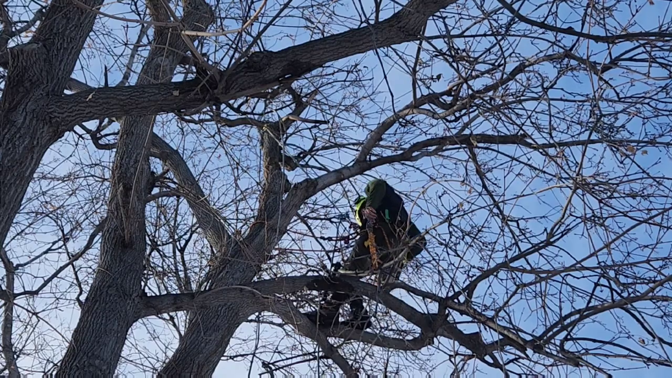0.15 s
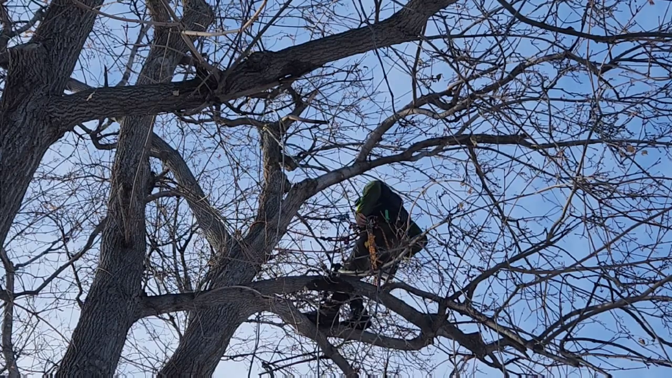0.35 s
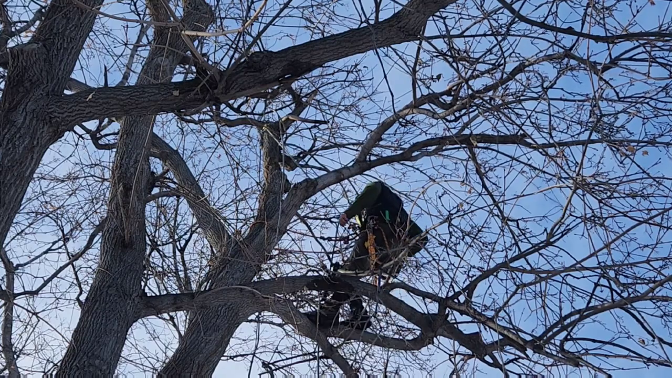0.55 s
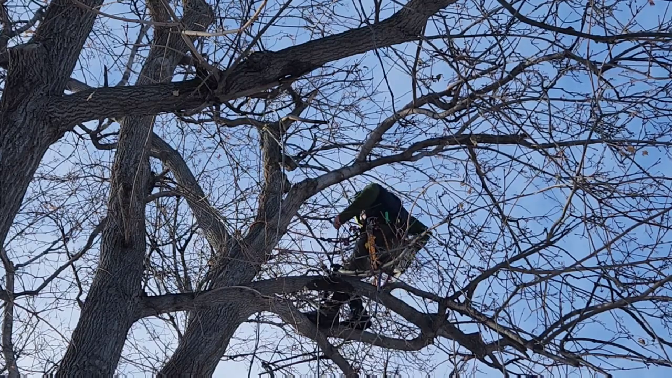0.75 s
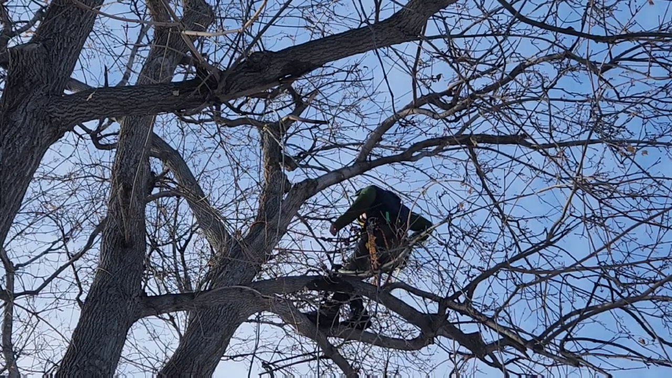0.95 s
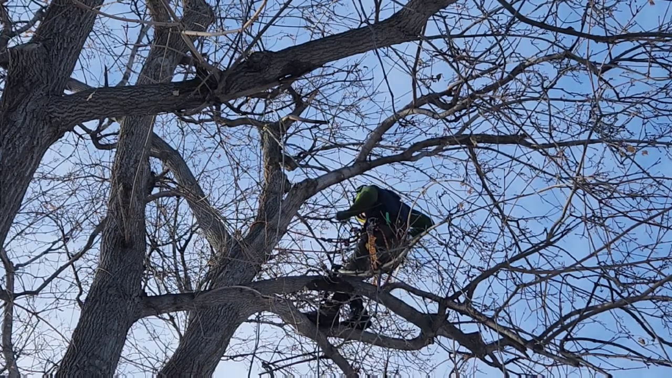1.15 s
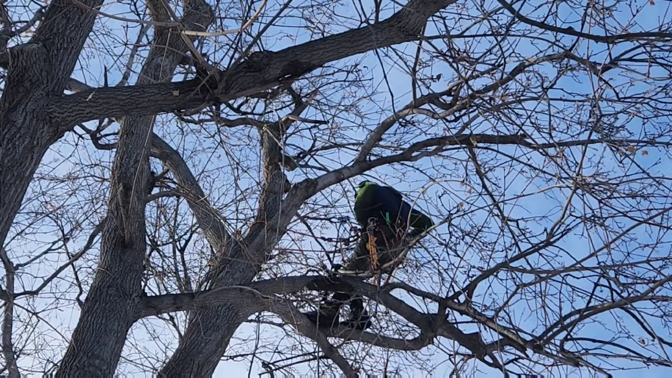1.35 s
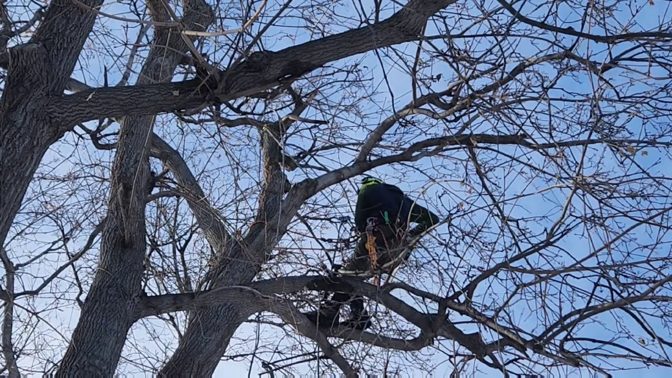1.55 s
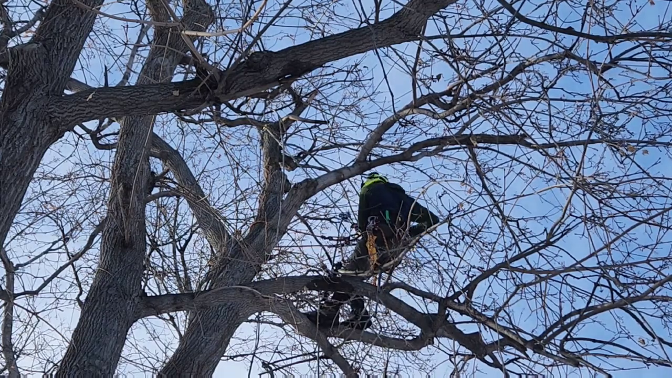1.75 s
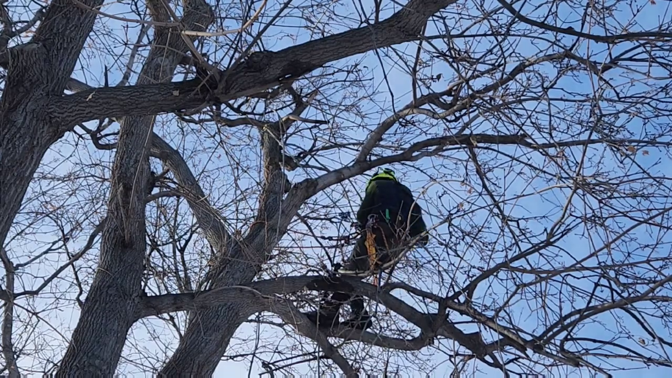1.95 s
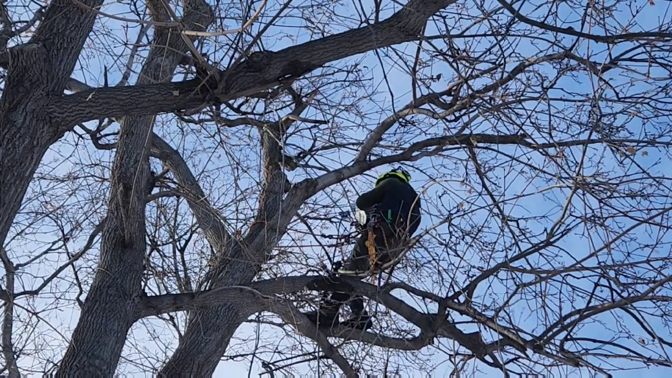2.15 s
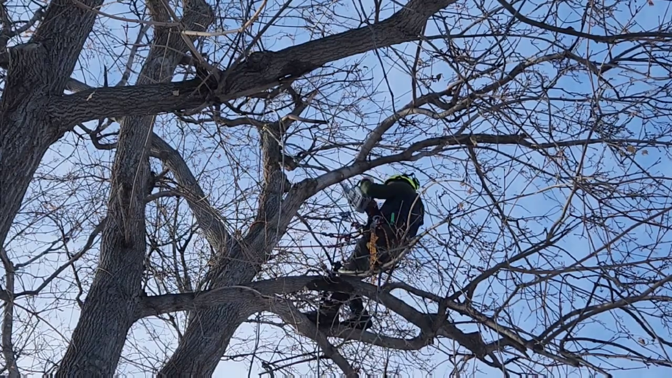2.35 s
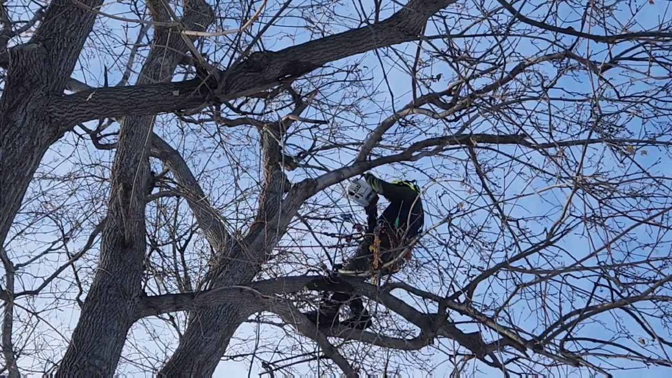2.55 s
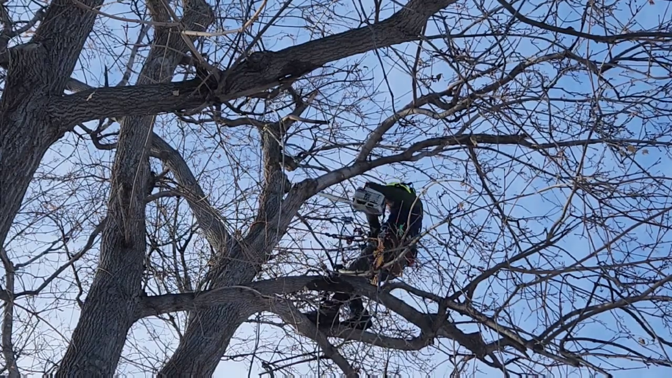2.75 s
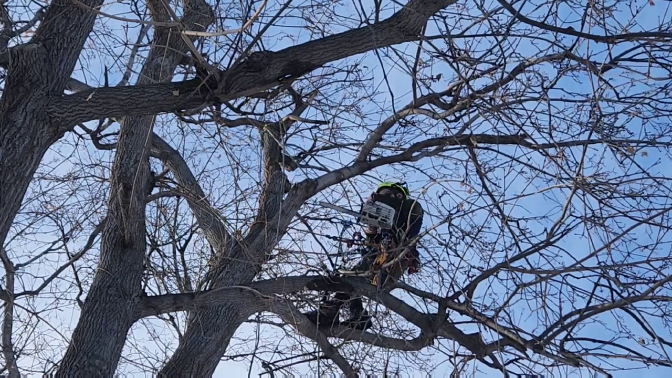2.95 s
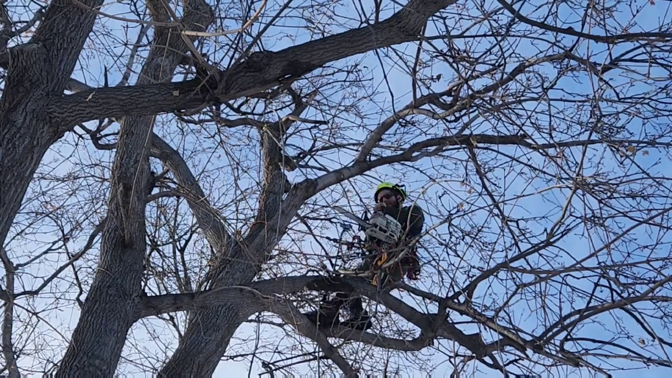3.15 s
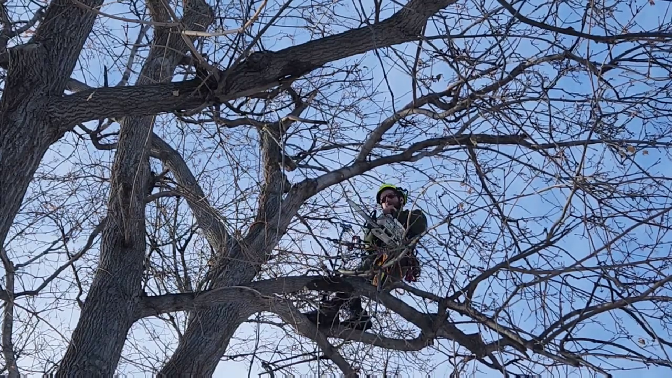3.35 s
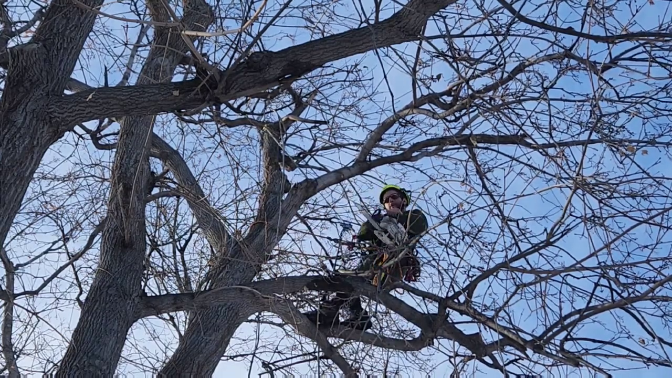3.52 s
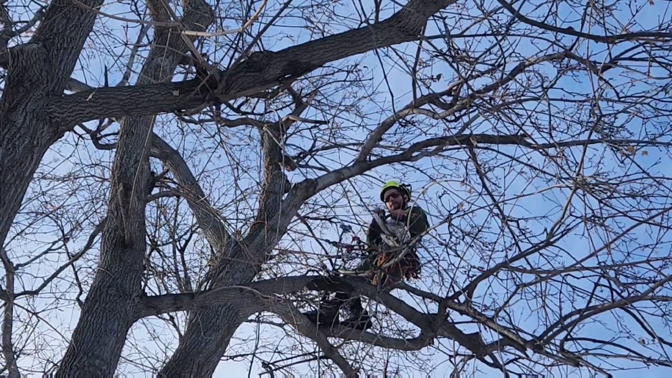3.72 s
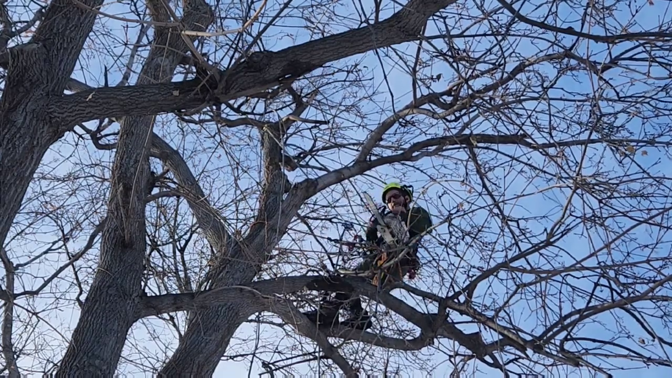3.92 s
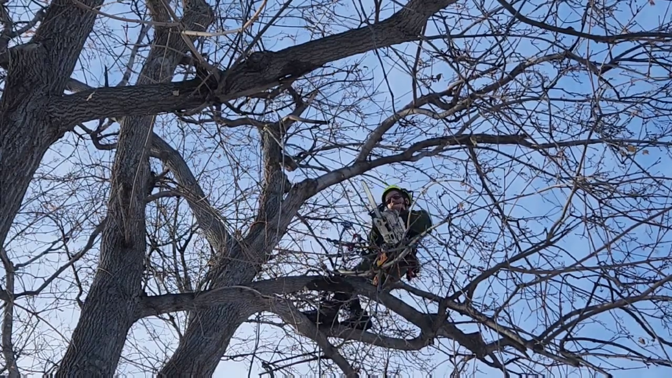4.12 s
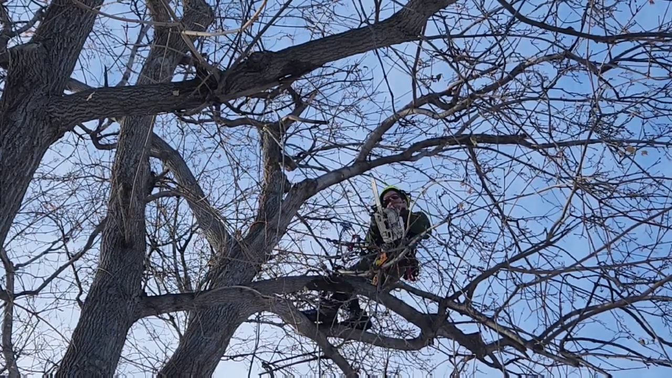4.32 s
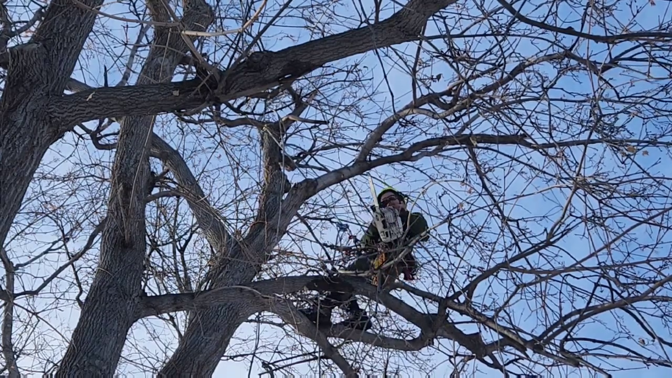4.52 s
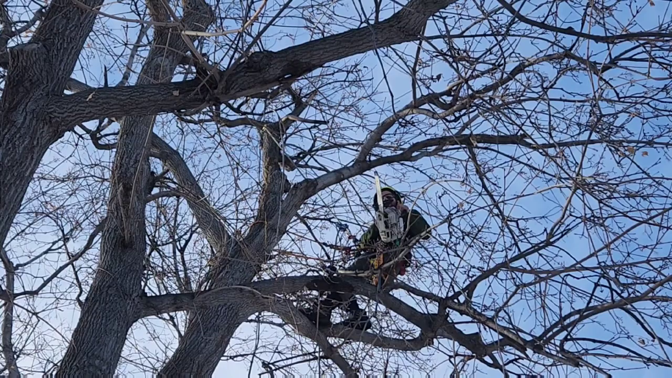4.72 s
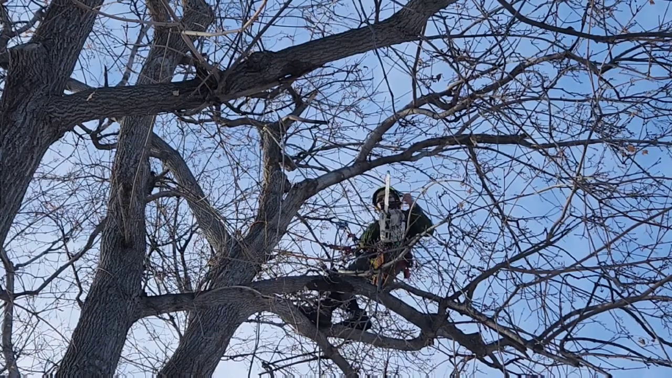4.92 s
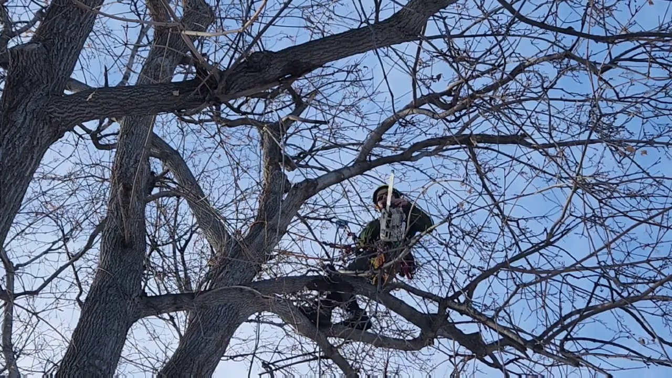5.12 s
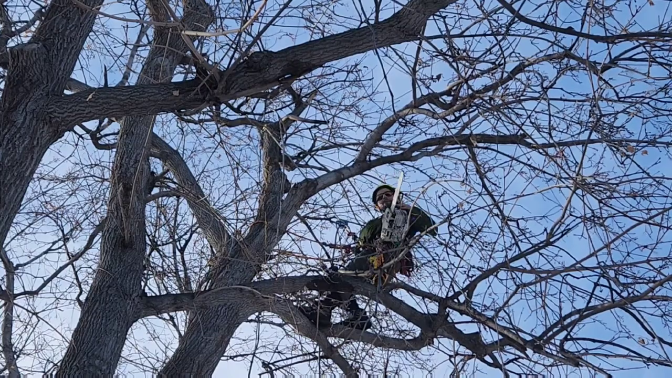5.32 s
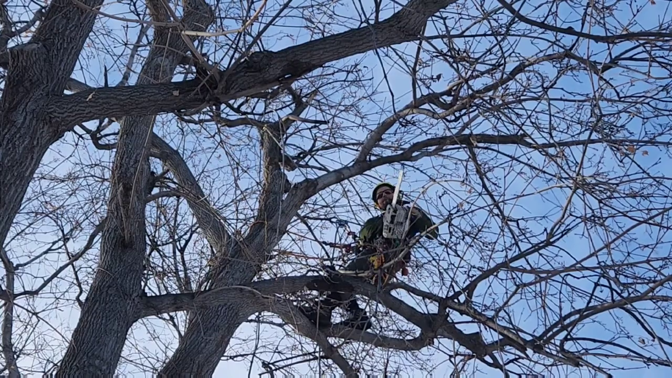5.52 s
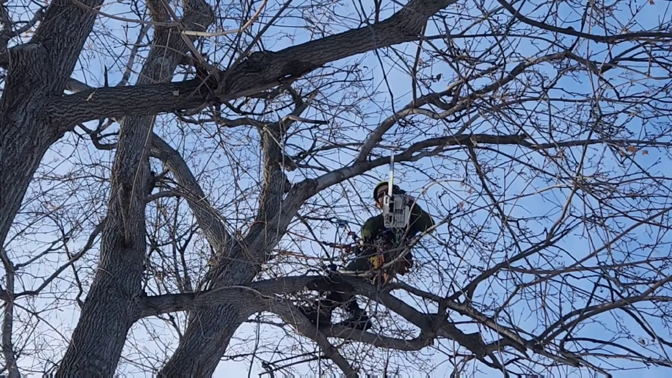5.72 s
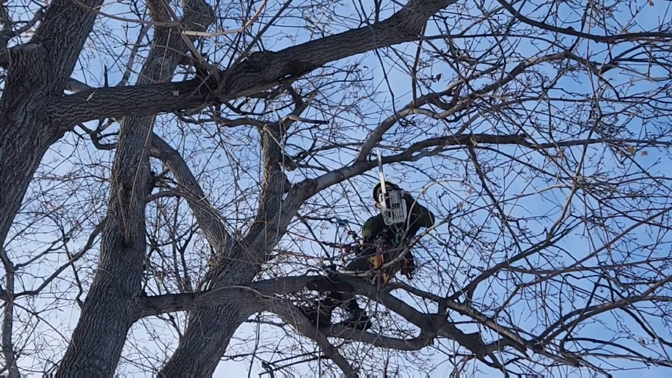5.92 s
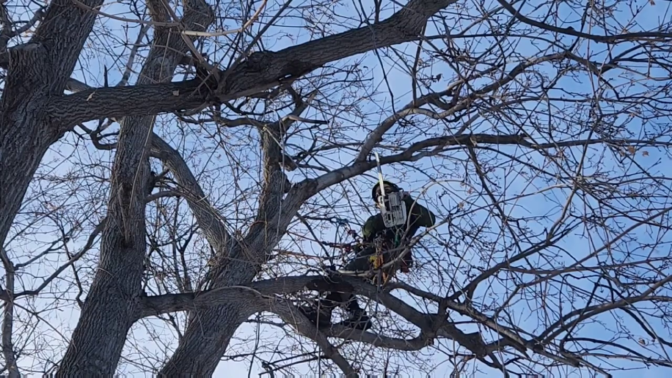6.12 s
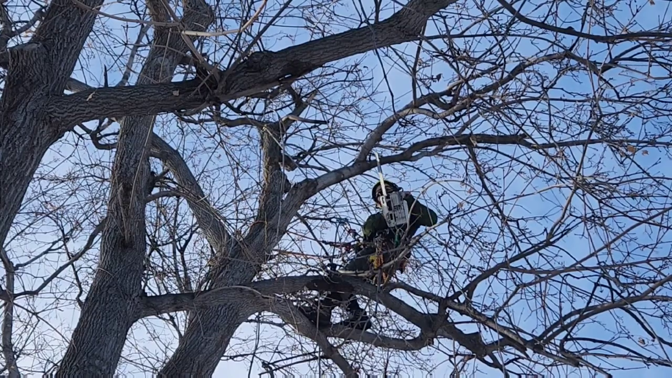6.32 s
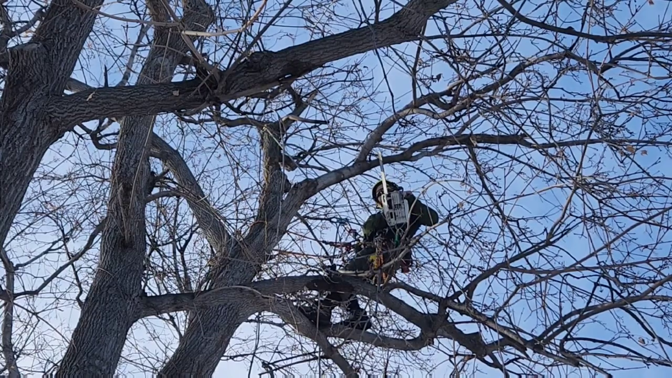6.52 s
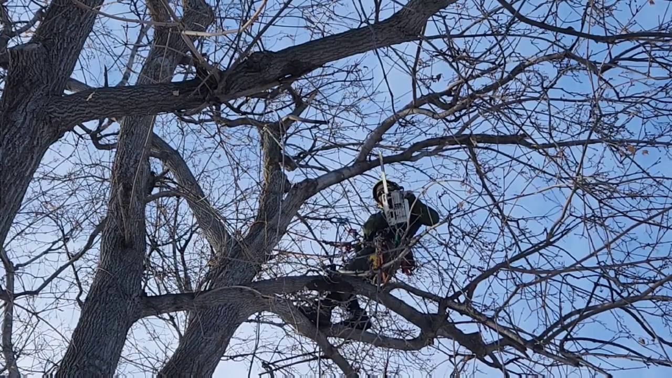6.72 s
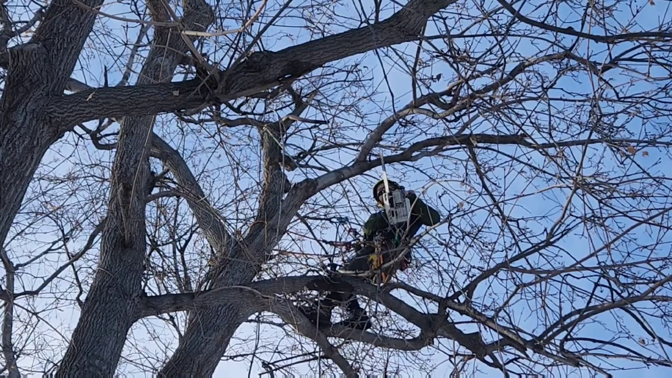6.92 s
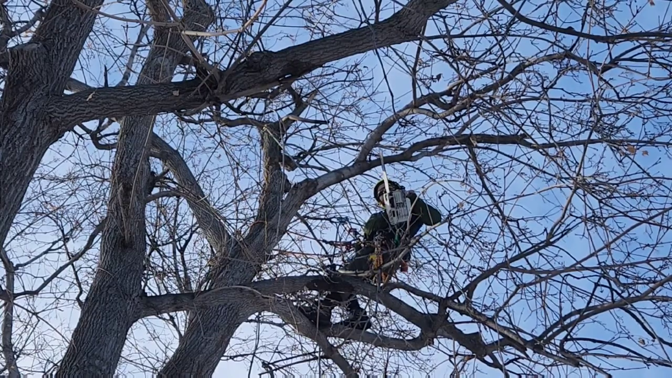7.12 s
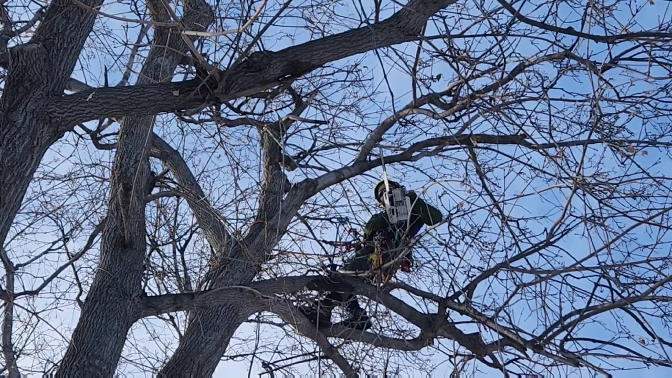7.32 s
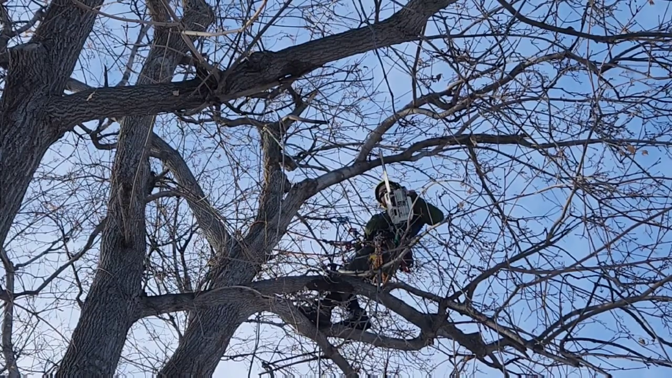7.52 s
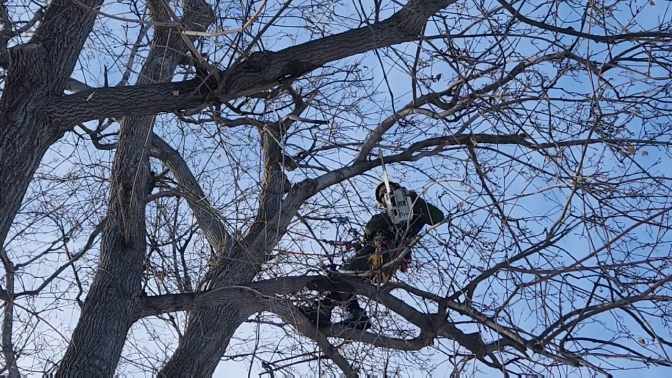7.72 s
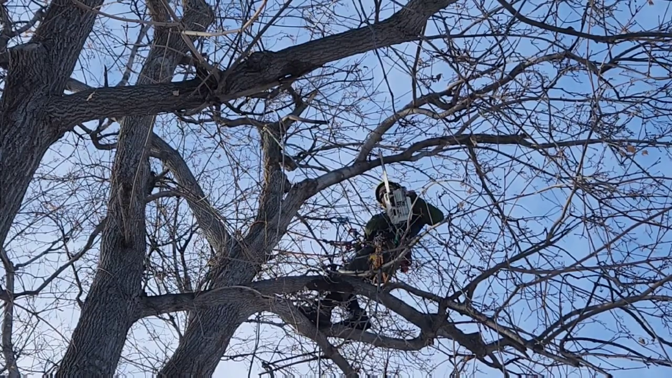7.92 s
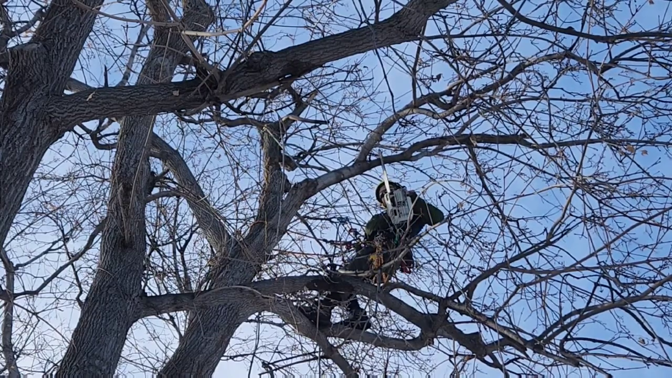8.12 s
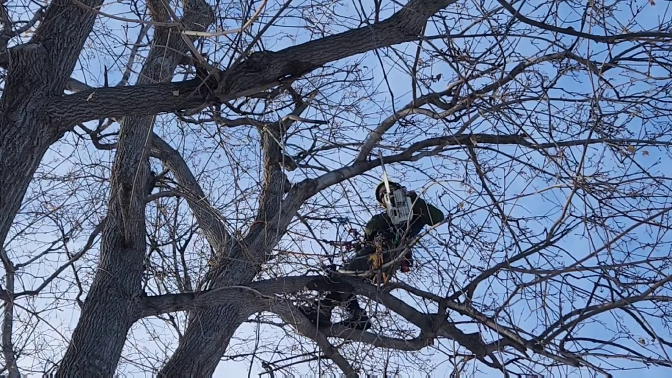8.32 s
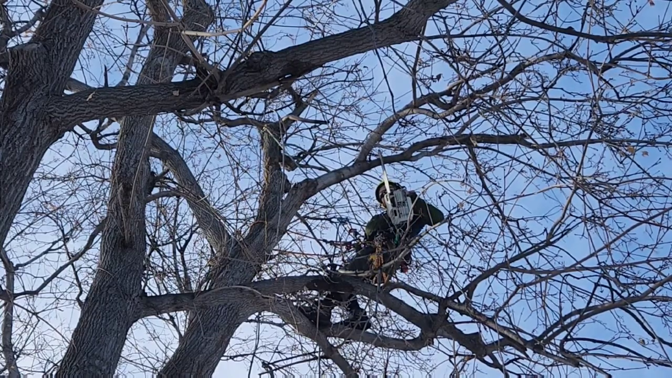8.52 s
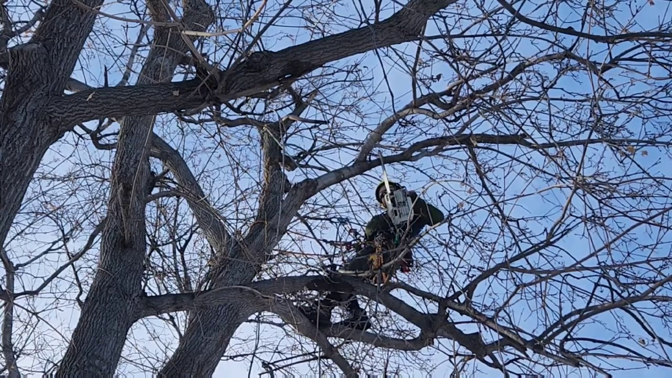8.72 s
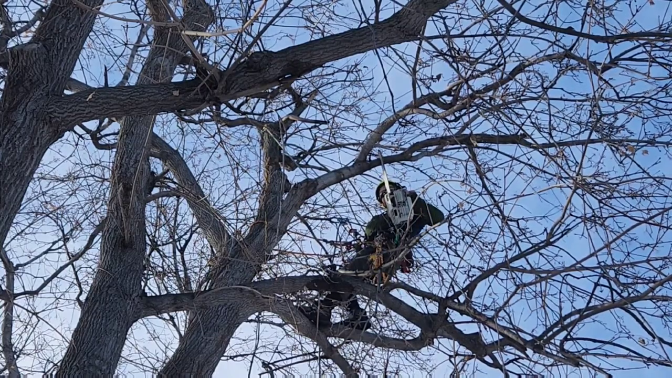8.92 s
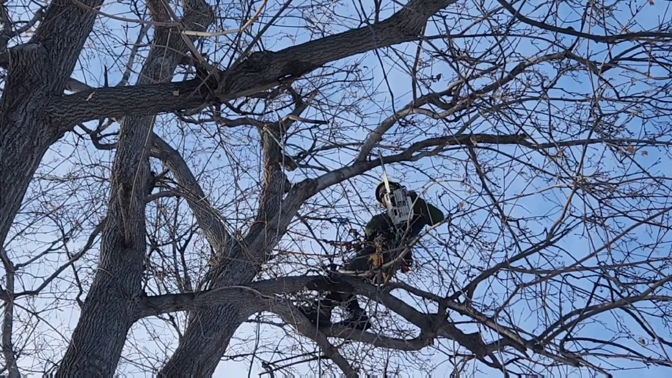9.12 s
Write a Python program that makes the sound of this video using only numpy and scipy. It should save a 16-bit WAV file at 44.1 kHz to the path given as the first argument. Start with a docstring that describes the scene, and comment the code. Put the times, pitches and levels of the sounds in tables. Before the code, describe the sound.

High in a bare tree, small scrapes, knocks and metal clinks, then a chainsaw is pull-started, putters at idle and revs to full throttle.

```python
"""A town rumbles far off while a climber high in a bare tree scrapes on bark, knocks a saw and clinks his gear.
He pull-starts the two-stroke chainsaw; it idles on pressure pulses, firing only every few turns.
It revs to full throttle on crank-locked pulses and tones, in clean runs and stretches of skipped firings.
Parts clatter and the chain rushes as shaped noise; branches and house walls scatter the sound."""
import sys
import numpy as np
from scipy import signal
from scipy.fft import rfft, irfft, next_fast_len
from scipy.io import wavfile
from scipy.ndimage import uniform_filter1d

SR = 44100
rng = np.random.default_rng(int(sys.argv[2]) if len(sys.argv) > 2 else 0)


def wrap_up_sound(samples):
    """Save the sound to the file named by the first command line argument, as 16-bit audio."""
    columns = np.atleast_2d(samples).T
    # keep every value between -1 and 1, then stretch to whole-number steps
    tamed = np.clip(columns, -1, 1)
    steps = np.round(tamed * 32767).astype(np.int16)
    wavfile.write(sys.argv[1], SR, steps)


N = 403956
TIME = np.arange(N) / SR

# Idle firings. Each row: time in seconds, relative level in dB, turns until the next firing.
FIRINGS = [(3.665, -13, 6), (3.7769, -13.5, 6), (3.8997, -13, 8), (4.0591, -13, 8), (4.205, -14, 6),
           (4.33, -13, 6), (4.4625, -12.5, 8), (4.6126, -12.5, 7), (4.7485, -13, 6), (4.8744, -13, 6),
           (4.997, -23, 1), (5.0181, -15, 6), (5.1408, -13, 6), (5.2603, -22, 1), (5.28, -15.5, 5),
           (5.3847, -14.5, 4), (5.471, -21, 1), (5.492, -15, 5), (5.602, -13, 7), (5.7307, -16, 3),
           (5.7917, -17.5, 3), (5.853, -13.5, 6), (5.969, -16, 4), (6.057, -12.5, 6), (6.1729, -18.5, 2),
           (6.213, -16.5, 5), (6.32, -12.5, 7), (6.4484, -12.5, 5), (6.548, -17, 4), (6.6287, -14, 5),
           (6.732, -13.5, 5), (6.8355, -13.5, 6), (6.951, -13.5, 3), (7.0087, -12, 2)]
# Gas pulse of an unfired turn. Each row: frequency in Hz, relative level in dB.
PUFF_SPECTRUM = [(40, -23), (100, -12), (170, -13), (230, 5), (300, 5), (420, -5.5), (600, -15.5),
                 (900, -13), (1300, -50), (2000, -51), (4000, -25), (12000, -54)]
# Gas pulse of a light firing. Each row: frequency in Hz, relative level in dB.
BARK_SPECTRUM = [(40, -3), (80, 2.5), (200, -3.5), (400, 2.5), (600, -1), (900, -9.5), (1300, -1.5),
                 (1800, -19), (2400, -10.5), (3000, -50), (5000, -16.5), (8000, -33), (15000, -70)]
# Colour of gas noise. Each row: frequency in Hz, relative density in dB.
JET_SPECTRUM = [(150, -40), (500, -4), (1300, 3.5), (2300, 1), (3100, -5), (4500, -2), (6000, -5),
                (7500, -2.5), (9500, -10), (15500, -7)]

CRANK_START_S, REV_START_S = 3.633, 7.0395
PART_THROTTLE_HZ, NOMINAL_HZ = 77.04, 155   # turns per second


def from_db(db):
    """Decibels to gain."""
    return 10 ** (np.asarray(db) / 20)


def rms_one(x):
    """Scale to rms 1."""
    return x / np.sqrt(np.mean(x ** 2) + 1e-20)


def at_hz(points, hz):
    """Read a dB spectrum on a log-frequency axis."""
    point_hz, db = np.transpose(points)
    return np.interp(np.log(hz + 1), np.log(point_hz), db)


def colour(x, spectrum, power=1):
    """Filter with a smooth zero-phase spectrum, its dB values scaled by power."""
    size = next_fast_len(x.shape[-1] + 4096)
    hz = np.fft.rfftfreq(size, 1 / SR)
    gain = from_db(at_hz(spectrum, hz) * power)
    return irfft(rfft(x, size) * gain, size)[..., :x.shape[-1]]


def diffuse(spectrum, size=N):
    """Stereo noise from all around: alike in the bass, less so in the treble."""
    # Each row: frequency in Hz, side minus mid level in dB.
    width = [(100, -15), (280, -15.5), (550, -4), (1200, -2), (2300, -3.5), (4000, -3.5), (12000, -4)]
    mid, side = rng.standard_normal((2, size))
    stereo = mid + colour(side, width) * [[1], [-1]]
    return rms_one(colour(stereo, spectrum))


def later(x, count):
    """Delay by a number of samples."""
    return np.pad(x, (count, 0))[:len(x)]


def clicks(times_s, heights):
    """One impulse at each time."""
    return np.bincount(np.round(times_s * SR).astype(int), heights, N)[:N]


def fading(x, decay_s):
    """Each impulse becomes an exponential decay of the same height."""
    return signal.lfilter([1], [1, -np.exp(-1 / (decay_s * SR))], x + 1e-18)


def outdoors(x, early_db, late_db, early_s=0.0061, late_s=0.048, size=30000):
    """Direct sound, quick scatter off the branches and a thin tail off the houses."""
    # Direct sound's tilt. Each row: frequency in Hz, left-right tilt in dB (scaled per side below).
    side_tilt = [(250, 1), (550, -1), (1100, 4), (2200, 5.5), (4500, -3), (8000, -3.5), (12000, 3)]
    # Colour of the scatter. Each row: frequency in Hz, relative level in dB.
    scatter = [(60, -11), (300, 3.5), (1000, 1), (2300, 6), (5000, 5), (15000, 0)]
    t = TIME[:size]
    early = np.exp(-t / early_s) * (1 - np.exp(-t / .003))
    late = np.exp(-t / late_s) * (1 - np.exp(-t / .015))
    envelope = from_db(early_db) * rms_one(early) + from_db(late_db) * rms_one(late)
    echoes = diffuse(scatter, size=size) * envelope / np.sqrt(size)
    left = later(colour(x, side_tilt, power=0.59), count=1)
    right = colour(x, side_tilt, power=-0.38)
    return np.array([left, right]) + signal.oaconvolve(x[None], echoes, axes=1)[:, :N]


def town():
    """Far town rumble: steady diffuse noise, heaviest in the bass."""
    # Each row: frequency in Hz, relative density in dB.
    rumble = [(12, -45), (20, -17), (32, -10), (56, -0.5), (76, 1.5), (102, -9), (211, -12.5), (252, -16),
              (285, -9.5), (448, -22.5), (859, -25.5), (1380, -35.5), (2720, -41.5), (3970, -57),
              (8000, -64), (10400, -95), (17600, -120)]
    return from_db(-45) * diffuse(rumble)


def scrapes(grain_db=2.5, skirt_db=-13.0):
    """Rope and clothing fibres catch on bark in fine grains: a dull rub and a bright hiss per stroke."""
    # Each row: centre in seconds, half length in seconds, rub level in dB, hiss level in dB.
    strokes = [(0.164, 0.062, -68, -70.5), (0.797, 0.12, -68, -86), (1.68, .03, -74, -67.5),
               (1.808, 0.042, -66, -74), (2.94, 0.078, -61, -87), (3.075, 0.026, -59, -68)]
    rub_hz, hiss_hz = 1400, 4350
    out = np.zeros(N)
    for k, hz in enumerate([rub_hz, hiss_hz]):
        spectrum = [(hz / 4, -50), (hz / 2, skirt_db), (hz, 0), (hz * 2, skirt_db), (hz * 4, -50)]
        band = rms_one(colour(rng.standard_normal(N), spectrum))
        out += band * sum(from_db(db[k]) * np.exp(-((TIME - s) / half_s) ** 2)
                          for s, half_s, *db in strokes)
    grain = rms_one(uniform_filter1d(rng.standard_normal(N), size=130))
    return out * rms_one(from_db(grain_db * grain))


def struck(hits, modes, crack_db, crack_s, size=8000):
    """Every blow rings the modes with strengths of its own, under a short noise crack."""
    out, t = np.zeros(N), TIME[:size]
    mode_hz, mode_db, t60_s = np.transpose(modes)
    decays = from_db(-60 * t / t60_s[:, None])
    for s, level_db, treble_db in hits:
        strength_db = mode_db + treble_db * (mode_hz > 2000) + rng.normal(0, 2, len(mode_hz))
        gain = from_db(strength_db) * rng.choice([-1, 1], len(mode_hz))
        # no two blows land on the same spot
        pitch_hz = mode_hz * (1 + 0.04 * rng.standard_normal(len(mode_hz)))
        ring = gain @ (np.sin(2 * np.pi * np.outer(pitch_hz, t)) * decays)
        crack = from_db(crack_db + treble_db) * rng.standard_normal(size) * np.exp(-t / crack_s)
        at = round(s * SR)
        out[at:at + size] += from_db(level_db) * (ring / np.abs(ring).max() + crack)
    return out


def saw_knocks():
    """Knocks on the saw's housing and chain brake ring short, damped modes."""
    # Each row: time in seconds, ring peak in dB, treble boost in dB.
    blows = [(.703, -25.5, -10), (.764, -38, -15), (.771, -34, -7), (.887, -35, -33), (1.815, -40.5, -2),
             (3.565, -25.5, 3.5), (4.1475, -4.5, 2.5), (4.184, -50, -3.5)]
    # Each row: nominal frequency in Hz, relative level in dB, t60 in seconds.
    housing = [(520, -9, .012), (683, -5, .012), (950, -9, .008), (1240, -2, .012), (1373, 0, .012),
               (1720, -5, .009), (2330, -6, .014), (3250, -11, .01), (3745, -13, .01), (4200, -14, .009),
               (5100, -14, .009), (6500, -17, .008), (7600, -21, .008)]
    return struck(blows, housing, crack_db=-24.0, crack_s=0.0039)


def gear_clinks():
    """Metal climbing gear clinks in short, high modes."""
    # Each row: time in seconds, ring peak in dB, treble boost in dB.
    blows = [(1.663, -43, -8), (1.78, -60, -6), (2.52, -61, 0), (3.060, -46, -8), (3.081, -37.5, -6),
             (3.121, -35.5, 7), (3.223, -33, -3), (3.313, -35, -3)]
    # Each row: nominal frequency in Hz, relative level in dB, t60 in seconds.
    gear = [(1250, 2, .012), (2450, -7, .008), (3650, -4, .008), (4720, -8, .007), (5450, -6, .007),
            (6130, -5, .007), (7500, 1, .008), (8200, -3, .008), (9100, -10, .01), (10200, -10, .035),
            (14650, -28, .03)]
    return struck(blows, gear, crack_db=-12.5, crack_s=0.0021)


def starter():
    """Gain of the starter cord's rattle: it swells with the pull and dies as the cord winds back."""
    pull_s, peak_s, peak_db = 3.562, 3.675, -38.0
    rise_db_per_s, fall_db_per_s = 102, 92
    past_s = TIME - peak_s
    slope_db = np.minimum(rise_db_per_s * past_s, -fall_db_per_s * past_s)
    return from_db(peak_db + slope_db) * (TIME > pull_s)


def shaken(jolt_db=6.0, settle_s=0.04):
    """Gain of loose parts that each idle firing jolts and that then settle."""
    fired_s, level_db, _ = np.transpose(FIRINGS)
    return 1 + fading(clicks(fired_s, from_db(level_db + jolt_db)), settle_s)


def crank_speed():
    """Turns per second with the throttle open: part throttle, then an S-curve up to top speed."""
    # Top speed wanders. Each row: time in seconds, speed in turns per second.
    top_speed = [(7.55, 156.2), (7.66, 162.4), (7.77, 160.5), (7.92, 163.8), (8.12, 156.4), (8.39, 152.6),
                 (8.61, 155.5), (8.8, 153.3)]
    full_throttle_s, run_up_s, run_up_shape = 7.1241, .1653, 1.541
    top_hz = np.interp(TIME, *np.transpose(top_speed))
    run_up = 1 - np.exp(-(np.maximum(TIME - full_throttle_s, 0) / run_up_s) ** run_up_shape)
    return PART_THROTTLE_HZ + (top_hz - PART_THROTTLE_HZ) * run_up


def with_speed(nominal_db, db_per_octave):
    """Gain that follows crank speed, nominal_db at nominal speed."""
    return from_db(nominal_db + db_per_octave * np.log2(crank_speed() / NOMINAL_HZ))


def machinery(rush_db=1.14, slap_db=3.0):
    """Starter, piston and clutch clatter; once the clutch grips, the chain rushes round the bar."""
    # Clatter colour. Each row: frequency in Hz, relative density in dB.
    metal = [(60, -37), (200, 5), (600, 1.5), (1200, 5.5), (1800, 2.5), (2300, 5), (3000, -5), (4400, -3.5),
             (7000, -11.5), (10000, -24), (15500, -30)]
    # Chain colour. Each row: frequency in Hz, relative density in dB.
    chain = [(1650, -10.5), (2800, -3), (3070, -13.5), (3500, 1), (3980, -11), (4360, -4.5), (5150, -3.5),
             (5610, -11.5), (6110, -1.5), (6420, -11.5), (7360, -5.5), (8930, -12.5), (11600, -10.5),
             (14800, -14), (15500, -12.5)]
    revving = TIME > REV_START_S
    slaps = rms_one(uniform_filter1d(rng.standard_normal(N), size=90))   # parts slap unevenly
    idle_gain = from_db(-42.0) * (TIME > CRANK_START_S)
    engine = np.where(revving, with_speed(-35.0, -3.5), idle_gain)
    clatter = np.hypot(engine, starter()) * from_db(slap_db * slaps) * shaken()
    running = with_speed(-20.5 + rush_db * slaps, 10.0) * revving
    rattle = (clatter + from_db(-5.5) * running) * diffuse(metal)
    return rattle + from_db(0.5) * running * diffuse(chain)


def exhaust(train, spectrum, resonance, phase_share=0.82, size=4096):
    """Each impulse becomes a pressure pulse of height 1: it swells as the port opens, then rings in the muffler."""
    # Resonances and notches. Each row: frequency in Hz, width in Hz, gain in dB before resonance scaling.
    muffler = [(397, 56, 5.5), (480, 30, -16.5), (529, 120, 7.5), (778, 66, -5.5), (887, 160, 9),
               (1003, 106, -11.5), (1280, 260, 10), (1613, 33, 8), (1830, 820, -1.5), (2024, 150, 9),
               (2218, 160, 6), (2400, 330, 6.5), (2940, 220, -10), (3280, 430, 10.5), (3940, 500, -28),
               (4390, 200, 17), (5250, 290, 11)]
    hz = np.fft.rfftfreq(size, 1 / SR)
    ringing_db = sum(g / (1 + (2 * (hz - f) / w) ** 2) for f, w, g in muffler)
    gain = from_db(at_hz(spectrum, hz) + resonance * ringing_db)
    cepstrum = irfft(np.log(gain))
    least_phase = rfft(2 * cepstrum[:size // 2], size).imag
    opening_phase = 2 * np.pi * hz * .0011   # 1.1 ms delay
    pulse = irfft(gain * np.exp(1j * (phase_share * least_phase - opening_phase)))
    return signal.oaconvolve(train, pulse / np.abs(pulse).max())[:N]


def jet(train, decay_s, rise_s=0.0013):
    """Gas tears through the outlet in a short hiss once the port is open."""
    opened = later(train, count=round(.001 * SR))
    burst = fading(fading(opened, decay_s), rise_s) / (rise_s * SR)
    return burst * rms_one(colour(rng.standard_normal(N), JET_SPECTRUM))


def idle(slowing=0.16, fade_db=2.0, uneven_db=1.0, fired_puff=0.17):
    """Each firing kicks the flywheel, which coasts through ever slower and softer unfired turns."""
    fired_s, level_db, coasting = np.transpose(FIRINGS)
    turns_s, vigour = [CRANK_START_S], [1]
    next_s = np.append(fired_s[1:], REV_START_S)
    for start, end, count in zip(fired_s, next_s, np.round(coasting)):
        part = np.arange(1, count) / count
        turns_s.extend(start + (end - start) * (part - slowing * part * (1 - part)))
        vigour.extend(from_db(fade_db * (1.0 - part)))
    uneven = from_db(rng.normal(0, uneven_db, len(turns_s)))
    puffs = clicks(np.array(turns_s), np.array(vigour) * uneven)
    barks = clicks(fired_s, from_db(level_db + 6.5))
    pumped = from_db(-21.5) * puffs + fired_puff * barks   # a fired turn pumps air too
    gas = exhaust(barks, BARK_SPECTRUM, resonance=0.42) + exhaust(pumped, PUFF_SPECTRUM, resonance=0.16)
    # explosions knock through the cylinder wall 2.8 ms before the firing's impulse
    explosions = fading(clicks(fired_s - 0.0028, from_db(level_db - 22)), decay_s=0.0037)
    knock = explosions * rms_one(colour(rng.standard_normal(N), JET_SPECTRUM))
    # squared: weak firings thud, strong ones crack
    crack = from_db(-8.5) * jet(barks ** 2 / barks.max(), decay_s=0.0021)
    return gas + knock + crack


def rev(skip_db=-23.0, rich_db=-0.5, hum_lag=0.43, tones_lag=0.15, part_load=0.5):
    """One gas pulse a turn: every turn fires in clean runs, every other turn elsewhere."""
    # Stretches in which every turn fires. Each row: start in seconds, end in seconds.
    clean_runs = [(7.03, 7.295), (7.36, 7.452), (7.565, 7.652), (7.752, 7.832), (7.905, 7.947),
                  (8.305, 8.33), (8.43, 8.47), (8.562, 8.596)]
    # Full firing's pulse. Each row: frequency in Hz, relative level in dB.
    blast = [(40, -15), (80, 1.5), (155, -3), (235, 11), (310, 3), (385, 3.5), (600, -2.5), (900, -7.5),
             (1300, -8), (1750, -8), (2400, 0.5), (2800, -11.5), (5000, -16), (14000, -39)]
    # Gas rushing through the ports. Each row: multiple of crank speed, relative level in dB.
    port_tones = [(4, -12.5), (5, -56), (6, -8), (7, -19), (8, -10.5), (9, -16), (10, -11.5)]
    speed = crank_speed()
    angle = np.cumsum(speed * (TIME >= REV_START_S)) / SR   # in turns
    whole_turns = np.arange(1, int(angle[-1]) + 1)
    turns_s = np.append(REV_START_S, np.interp(whole_turns, angle, TIME))
    clean = np.any([(turns_s >= a) & (turns_s <= b) for a, b in clean_runs], axis=0)
    fires = clean.copy()
    for k in range(1, len(turns_s)):
        fires[k] |= not fires[k - 1]
    force = from_db(np.where(fires, rich_db * ~clean, skip_db))
    train = clicks(turns_s, force)

    # pulses turn from light to full as the load rises
    load = np.clip(part_load + (speed - PART_THROTTLE_HZ) / 70, 0, 1)
    light = train * (1 - load)
    gas = exhaust(light, BARK_SPECTRUM, resonance=0.38) + exhaust(train * load, blast, resonance=1.61)
    gas = gas + from_db(-10.0) * exhaust(light, PUFF_SPECTRUM, resonance=0.22)
    gas = gas / np.sqrt(uniform_filter1d(gas ** 2, size=3400) + 1e-4)   # even out over 77 ms

    # the ports stay open for a fixed crank angle, so their tones climb with the speed
    tones = sum(from_db(db) * np.sqrt(2) * np.cos(2 * np.pi * k * (angle - tones_lag))
                for k, db in port_tones)
    tones = tones * (0.56 + 0.24 * np.interp(TIME, turns_s + 0.0012, force))   # sag on unfired turns

    # fired or not, the piston pumps air once a turn; the hum is stronger in clean runs
    hum_skipping_db, hum_clean_db, hum_settle_s = -26, -21.5, 0.09
    clean_share = uniform_filter1d(np.interp(TIME, turns_s, clean), size=round(hum_settle_s * SR))
    hum_db = hum_skipping_db + (hum_clean_db - hum_skipping_db) * clean_share
    hum = with_speed(hum_db, 6.5) * -np.cos(2 * np.pi * (angle - hum_lag))

    hiss = from_db(-17.0) * jet(light, decay_s=0.0016)   # the first firings still crack
    spun_up = np.minimum(angle, 1)
    return with_speed(-18, 6.5) * (gas + spun_up * tones) + spun_up * hum + hiss


def scene():
    """Saw and gear up in the tree, over the far rumble."""
    climber = outdoors(scrapes() + saw_knocks() + gear_clinks(), early_db=-6.0, late_db=-15.0)
    idling = outdoors(idle(), early_db=-13.0, late_db=-8.0)
    revving = outdoors(rev(), early_db=-13, late_db=-14)
    return town() + climber + machinery() + idling + revving


def record(dry):
    """Peaks beyond full scale are clipped, then a steep low-pass cuts the top."""
    cutoff_hz = 15800
    low_pass = signal.ellip(12, .2, 80, cutoff_hz, fs=SR, output="sos")
    return signal.sosfilt(low_pass, np.clip(dry, -1, 1))


dry = scene()
out = record(dry)
wrap_up_sound(out)
```